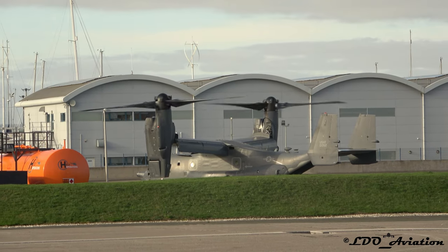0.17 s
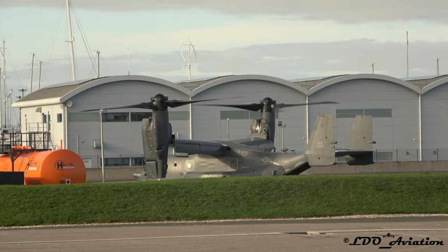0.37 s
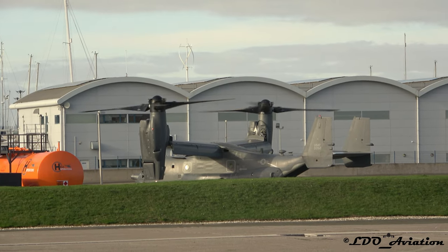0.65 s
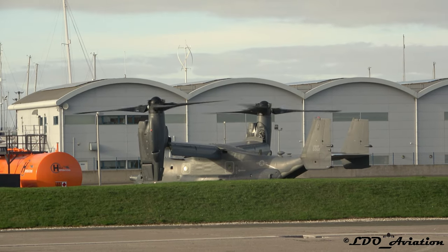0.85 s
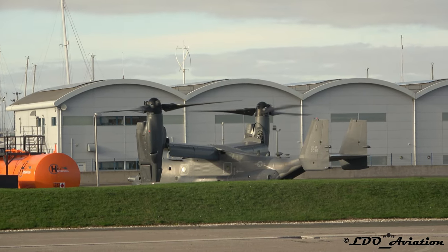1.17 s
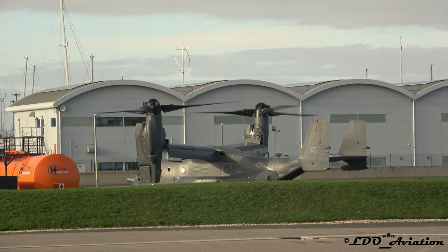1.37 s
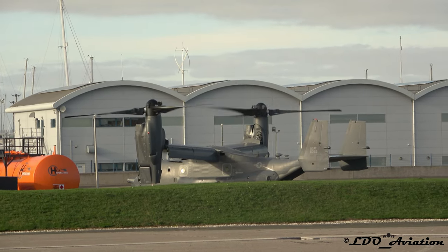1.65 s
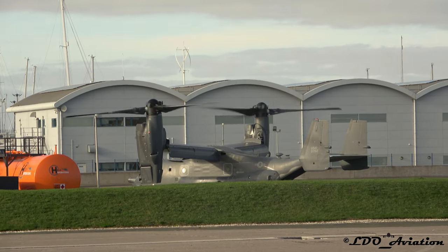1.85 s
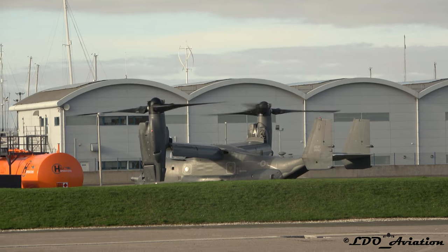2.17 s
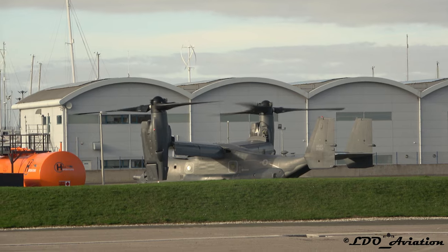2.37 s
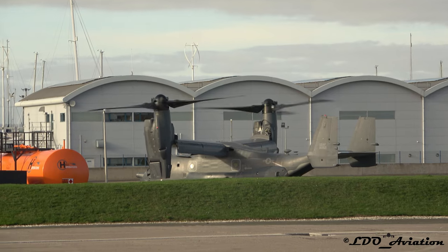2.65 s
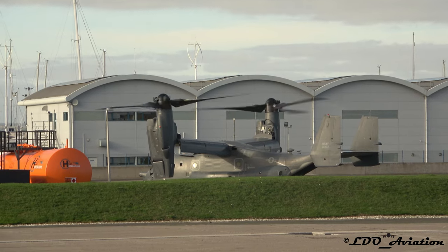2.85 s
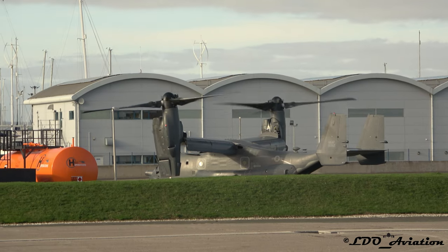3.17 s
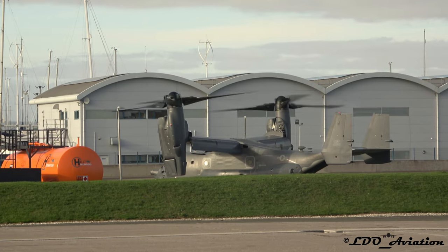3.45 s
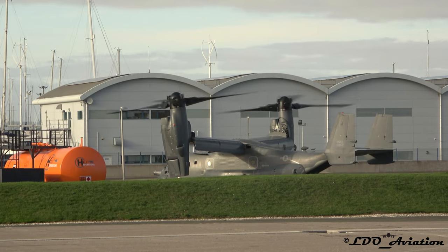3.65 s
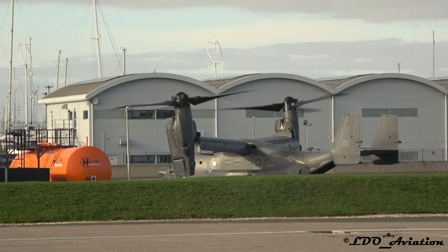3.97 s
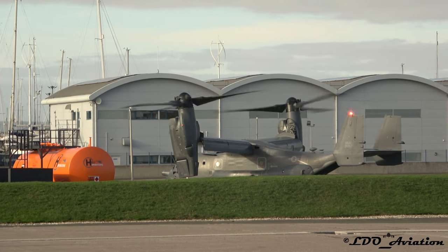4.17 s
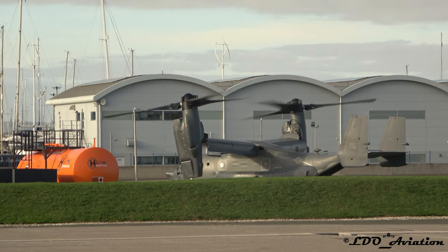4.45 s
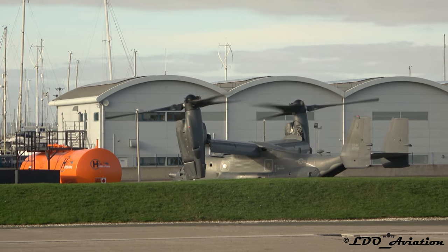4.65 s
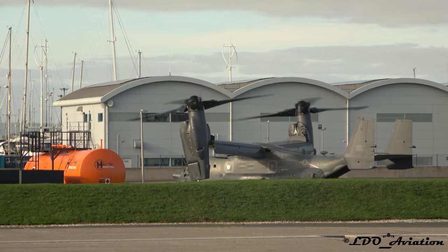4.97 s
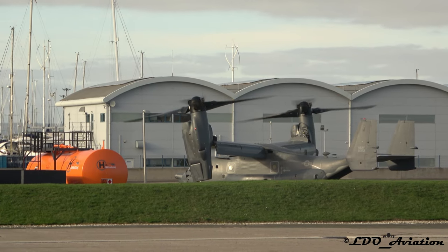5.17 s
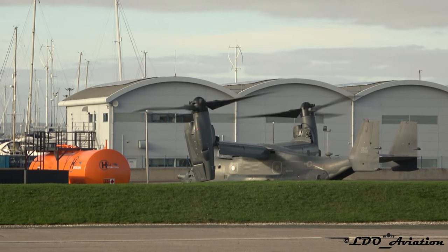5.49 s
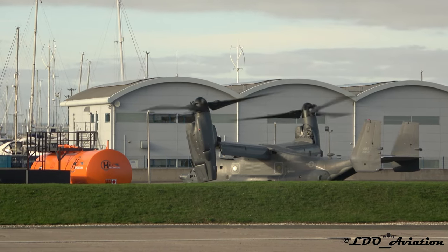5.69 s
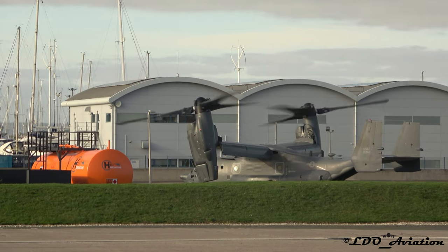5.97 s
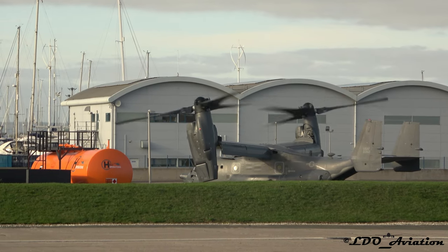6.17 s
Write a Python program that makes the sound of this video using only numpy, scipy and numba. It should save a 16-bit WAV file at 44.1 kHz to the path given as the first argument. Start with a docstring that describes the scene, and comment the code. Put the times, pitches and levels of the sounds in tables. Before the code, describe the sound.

Outdoors at an airfield, a tiltrotor stands with both rotors turning. Blades beat a steady, fast chop of low thumps and torn-air slaps, about twenty a second, some cracking harder than others. Behind them sit engine roar, airy hiss and a faint smeared turbine whine. Wind rumbles over the stereo microphones, harder on the left, strongest around the middle.

```python
"""Heavy, regular thumps and slaps of torn air come first: a tiltrotor aircraft idling on an apron some way off.
Its two rotors turn in step; each blade passage pulses filtered noise into slaps, swish and downwash.
Engine roar, hiss and a blurred compressor whine are noise bands chopped by the blades, over a low sine hum.
The aircraft arrives again by way of ground and hangar walls; gusts rumble on two microphones, the left harder."""
import sys
import numpy as np
from scipy import signal
from scipy.fft import rfft, irfft, next_fast_len
from scipy.io import wavfile
from scipy.ndimage import uniform_filter1d
from numba import njit

SR = 44100
rng = np.random.default_rng(int(sys.argv[2]) if len(sys.argv) > 2 else 0)


def store_wav(level_fs):
    """Save 16-bit WAV to argv[1]."""
    pcm = np.round(np.clip(np.atleast_2d(level_fs), -1, 1) * 32767)
    wavfile.write(sys.argv[1], SR, pcm.T.astype(np.int16))


N = 278712
T = np.arange(N) / SR  # time [s]
BLADE_HZ = 19.683  # blade passages per second, the same for both rotors


def undb(db):
    """Turn decibels into an amplitude factor."""
    return 10 ** (np.asarray(db) / 20)


def unit(x):
    """Scale to rms 1."""
    return x / np.sqrt(np.mean(x ** 2))


def curves(table):
    """Draw the columns of a table as automation curves, one value a sample."""
    s, *columns = np.transpose(table)
    return [np.interp(T, s, c) for c in columns]


def walk(rate):
    """Wander at random: levels held 1 / rate s and smoothed twice, rms 1."""
    hold = int(SR / rate)
    steps = np.repeat(rng.standard_normal(N // hold + 1), hold)
    smooth = uniform_filter1d(uniform_filter1d(steps, hold), hold)
    return unit(smooth[:N])


def shape(x, points, recur=0.):
    """Filter by (Hz, dB) points; a share may recur every blade passage, which draws lines in the spectrum."""
    hz, db = np.transpose(points)
    size = next_fast_len(N)
    f = np.maximum(np.fft.rfftfreq(size, 1 / SR), 1)
    gain = undb(np.interp(np.log(f), np.log(hz), db))
    gain = gain / (1 - min(recur, .9) * np.exp(-2j * np.pi * f / BLADE_HZ))
    return irfft(rfft(x, size) * gain, size)[..., :N]


def air(points, recur=0.):
    """Turbulence: noise of the given colour, rms 1."""
    return unit(shape(rng.standard_normal(N), points, recur))


@njit
def lowpass(x, hz, damp):
    """State-variable low-pass whose edge may move."""
    y, band, low = np.empty(len(x)), 0., 0.
    for i in range(len(x)):
        g = np.tan(np.pi * hz[i] / SR)
        v = (band + g * (x[i] - low)) / (1 + g * (g + damp))
        y[i] = low + g * v
        band, low = 2 * v - band, 2 * y[i] - low
    return y


def passage(delay_ms, width_ms, jitter_ms, scatter_db):
    """A bell-shaped bump once a blade passage, each a little early or late, bigger or smaller."""
    cycle = (T - delay_ms / 1000) * BLADE_HZ
    blade = np.round(cycle).astype(int)
    timing, size = rng.standard_normal((blade.max() + 2, 2))[blade + 1].T
    ms = (cycle - blade) * 1000 / BLADE_HZ - jitter_ms * timing
    bell = np.exp(-.5 * (ms / width_ms) ** 2)
    taper = np.cos(np.pi * (cycle - blade))  # silent halfway between blades
    return bell * taper * undb(scatter_db * size)


# pressure pulse of each rotor, before the high-pass: (delay [ms], width [ms], level [dB])
THUMP_PULSES = [(3.0, 2.27, -12), (15.5, 1.22, -12.5)]


def thumps():
    """The air each blade shoulders aside: a pressure pulse that repeats closely, hence a stack of low lines."""
    pulses = sum(undb(db) * passage(ms, width, 0.13, 0.71) for ms, width, db in THUMP_PULSES)
    return signal.sosfilt(signal.butter(1, 60, "high", fs=SR, output="sos"), pulses)


# the loud slap passes from one rotor to the other as the craft creeps round:
# (time [s], first rotor: slap level [dB], delay [ms], tip crack level [dB], second rotor: the same three)
ROTOR_SLAPS = [(0.0, -21.5, 7.8, -36, -21.5, 19.2, -28.5), (0.5, -23, 8.3, -32, -21, 18.1, -27.5),
               (0.85, -14, 5.6, -34, -22, 18, -36), (1.1, -18, 5.9, -33, -25, 19.6, -42),
               (1.5, -18, 4, -41, -28, 16.5, -46), (1.9, -17, 5.1, -38, -23, 16, -43),
               (2.3, -16.5, 3.5, -37, -24, 15.3, -40), (2.7, -24, 5.4, -30, -14, 14.7, -29),
               (3.1, -26, 4.7, -38, -19, 10.5, -43), (3.4, -20, 6, -43.5, -20.5, 13.7, -48),
               (3.9, -27.5, 6.1, -44, -18.5, 17.5, -40), (4.3, -28, 7, -42, -20.5, 16, -36),
               (4.6, -36, 6.7, -40, -19.5, 15, -32.5), (5.05, -36, 7.6, -50, -26.5, 15, -35.5),
               (5.45, -28, 7.3, -46, -19.5, 14.7, -26.5), (5.8, -36, 6.6, -44, -26.5, 13.7, -27),
               (5.95, -26, 4.6, -46, -25.5, 12.2, -38), (6.32, -25.5, 6.2, -46, -25.5, 13, -43)]
# colours of the torn air, lower and upper part, and of the tip crack: (frequency [Hz], relative level [dB])
SLAP_LOW_COLOUR = [(150, -23), (350, -0.5), (700, 0.5), (1000, 0.5), (1350, -4), (2000, -37), (4000, -72)]
SLAP_HIGH_COLOUR = [(500, -4.5), (1000, 0), (1500, 8.5), (2300, -2.5), (3500, -13.5), (6000, -24),
                    (9000, -35), (13000, -80)]
CRACK_COLOUR = [(900, -16), (2000, 12), (3000, 3), (5000, -0.5), (7500, -10.5), (10000, -35), (13000, -60)]
# per rotor: upper part of the slap against the lower [dB], lag of the lower part [ms]
HIGH_DB, LOW_LATE_MS = (-17, -3), (0.4, 1.2)
RAGGED_DB, RAGGED_PER_S = 1.4, 400  # rough edge on the slap level


def slaps(rotors):
    """Each blade cuts the wake of the one before: a few ms of torn air with a bright crack from the tip.
    Lower and upper parts vary on their own, so the slaps differ in colour."""
    out = 0
    for (db, ms, crack_db), high_db, late in zip(rotors, HIGH_DB, LOW_LATE_MS):
        low = passage(ms + late, 3.65, 1.2, 1.15) * air(SLAP_LOW_COLOUR, recur=0.38)
        high = passage(ms, 3.0, 1.5, 1.06) * air(SLAP_HIGH_COLOUR)
        level = undb(db + RAGGED_DB * walk(RAGGED_PER_S))
        crack = passage(ms + 0.65, 2.36, 1.5, 2.6) * air(CRACK_COLOUR)
        out = out + level * (low + undb(high_db) * high) + undb(crack_db) * crack
    return out


# slaps that stand out, before the trims below: (time [s], level [dB], tip crack against it [dB])
VORTEX_HITS = [(0.767, -8, -24), (0.868, -21, -19), (0.969, -10, -18), (1.07, -11.5, -13),
               (1.526, -23, -17), (1.577, -24, -15), (1.678, -13, -16), (1.83, -9, -15), (2.088, -9, -30),
               (2.188, -14.5, -24), (2.239, -16, -15), (2.288, -9, -20), (2.388, -9, -20),
               (2.435, -11, -23), (2.488, -9.5, -21), (2.704, -6, -22), (2.752, -8, -18),
               (2.906, -9.5, -29), (2.956, -6.5, -22), (3.007, -11.5, -11), (3.057, -5.5, -26),
               (3.409, -9, -25), (3.671, -9, -25), (3.723, -10, -30), (3.828, -15, -30),
               (4.383, -10.5, -25), (4.429, -19, -19), (5.245, -19, -19), (5.394, -17, -21),
               (5.449, -11.5, -18), (5.499, -11.5, -16), (5.549, -13.5, -16), (5.601, -20, -14),
               (5.65, -11, -14), (5.703, -14, -7), (5.751, -12, -12), (5.8, -16.5, -3), (5.855, -17, -13),
               (6.103, -21, -19)]
HARD_BODY_DB, HARD_TIP_DB, HARD_SHOCK_DB = -9, -5, -1  # trims of torn air, tip crack and shock
HARD_RISE_S, HARD_WIDTH_S = 0.001694, 0.0014  # table time to peak, width of the bell


def hard_slaps():
    """The blade passages that meet a vortex squarely: a small shock, torn air around it and a crack from the tip."""
    body, tip, shock = np.zeros((3, N))
    for s, db, tip_db in VORTEX_HITS:
        peak_s = s + HARD_RISE_S
        bump = np.exp(-.5 * ((T - s - HARD_RISE_S) / HARD_WIDTH_S) ** 2) * undb(db)
        body = body + bump
        tip = tip + bump * undb(tip_db)
        shock[int(peak_s * SR)] = undb(db)
    shock = shape(shock, SLAP_HIGH_COLOUR)
    shock = shock * body.max() / shock.max()
    torn = (air(SLAP_HIGH_COLOUR) + air(SLAP_LOW_COLOUR)) / np.sqrt(2)
    cracks = undb(HARD_TIP_DB) * tip * air(CRACK_COLOUR)
    return undb(HARD_BODY_DB) * body * torn + cracks + undb(HARD_SHOCK_DB) * shock


# hiss of the advancing blade: (time [s], level [dB])
SWISH_LEVEL = [(0, -30), (.5, -24.5), (.9, -23), (1.5, -30), (2.2, -22.5), (3.0, -26.5), (3.6, -47),
               (4.5, -32), (5.4, -41), (6.32, -29)]
# its colour: (frequency [Hz], relative level [dB per Hz])
SWISH_AIR = [(400, -22), (700, -7), (1100, 5.5), (1500, -5), (2500, -14.5), (5000, -17.5), (9000, -47)]


def swish():
    """The advancing blade hisses a little before the first rotor's next slap."""
    level_db, = curves(SWISH_LEVEL)
    return undb(level_db) * passage(45.5, 6, 4.0, 2.1) * air(SWISH_AIR)


# strength of the downwash: (time [s], level [dB])
DOWNWASH_LEVEL = [(0.0, -27.5), (0.35, -25.5), (0.65, -30.5), (1.3, -24.5), (1.65, -33.5), (2.2, -25.5),
                  (3.1, -27), (3.75, -35), (4.45, -26.5), (5.1, -26), (5.55, -30), (6.32, -26.5)]
# its colour: (frequency [Hz], relative level [dB per Hz])
DOWNWASH_COLOUR = [(60, -30), (130, -20), (210, 1.5), (300, 10), (400, 3.5), (520, 1.5), (800, -49),
                   (2000, -70)]
WASH_LATE_MS = (2.7, 2.6)  # swell after each rotor's slap


def wash(rotors):
    """Low churning downwash that swells behind each rotor's slap; the next blade meets much the same eddies."""
    level_db, = curves(DOWNWASH_LEVEL)
    louder_db = np.maximum(rotors[0][0], rotors[1][0])
    sweep = 0.35
    for (slap_db, ms, _), late in zip(rotors, WASH_LATE_MS):
        sweep = sweep + undb(0.22 * (slap_db - louder_db)) * passage(ms + late, 4.3, 2.8, 0.66)
    return undb(level_db) * unit(sweep * air(DOWNWASH_COLOUR, recur=0.69))


def drone():
    """A low hum on the fourth multiple of the blade rate, wavering in strength."""
    hum = np.sqrt(2) * np.sin(2 * np.pi * 4 * BLADE_HZ * T)
    return hum * undb(-34.5 + 2.0 * walk(2.97))


# turbine levels, the hiss before chopping: (time [s], hiss level [dB], whine level [dB])
TURBINE_LEVELS = [(0.0, -33, -48), (0.15, -35.5, -48), (0.45, -34, -50), (0.8, -34, -52), (1.1, -35, -44.5),
                  (1.5, -35, -48), (1.9, -35.5, -50), (2.25, -36.5, -50), (2.55, -33, -46), (2.8, -34, -45),
                  (3.1, -33.5, -49), (3.35, -33.5, -48), (3.65, -38, -52), (4.0, -34.5, -50),
                  (4.3, -36, -46.5), (4.65, -35.5, -46.5), (5.0, -36, -46), (5.4, -37.5, -46),
                  (5.75, -39.5, -49.5), (6.05, -40, -47), (6.32, -38.5, -50)]
# colours at the source: (frequency [Hz], relative level [dB per Hz])
ROAR_COLOUR = [(60, -14), (130, 4.5), (200, -4), (500, -4), (1000, -8), (1500, -11), (2200, -16.5),
               (3500, -36.5), (8000, -51), (12000, -93)]
HISS_COLOUR = [(1000, -1.5), (2000, 1), (3000, -0.5), (4700, -2), (5600, -6.5), (7000, -10), (8000, -14.5),
               (9000, -21.5), (10000, -28), (12000, -31), (14000, -40)]
WHINE_COLOUR = [(5300, -24), (5700, -8), (5880, 0), (6080, 0), (6300, -8), (6900, -26)]
ROAR_DB, ROAR_FADE_DB_PER_S, ROAR_SETTLES_S = -25, 0.73, 3.8  # start level before chopping, then a slow fade


def engines():
    """Roar, hiss and whine pass through the rotor discs, which chop them lightly."""
    hiss_db, whine_db = curves(TURBINE_LEVELS)
    roar_db = ROAR_DB - ROAR_FADE_DB_PER_S * np.minimum(T, ROAR_SETTLES_S)
    roar_chop = 1 + .5 * passage(7.5, 37.0, 3.8, 1.4)
    roar = roar_chop * air(ROAR_COLOUR, recur=0.33) * undb(roar_db + 0.23 * walk(3.8))
    hiss_chop = 1 + 0.4 * passage(1.8, 26.0, 22.0, 1.0)
    hiss = hiss_chop * air(HISS_COLOUR) * undb(hiss_db + .5 * walk(7.9))
    # turbulence on the way smears the compressor tone into a band
    whine_chop = 1.1 + passage(3.1, 6.8, 2.7, 1.5)
    whine = unit(whine_chop * air(WHINE_COLOUR)) * undb(whine_db + 1.1 * walk(14))
    return roar + hiss + whine


GROUND_SHARE, GROUND_HZ, BOUNCE_MS = 0.24, 2090, 2.882  # bounce amplitude, low-pass edge, mean lag


def ground(x):
    """The bounce off apron and grass, duller and a few ms late, combs the spectrum; moving air makes the lag waver."""
    lag = (BOUNCE_MS + 0.1 * walk(2.46)) * SR / 1000
    late = np.interp(np.arange(N) - lag, np.arange(N), x)
    late = signal.sosfilt(signal.butter(1, GROUND_HZ, fs=SR, output="sos"), late)
    return (x + GROUND_SHARE * late) / np.sqrt(1 + GROUND_SHARE ** 2)


# hangars, grass bank and camera body colour what arrives:
# (frequency [Hz], gain at first [dB], gain midway [dB], gain at last [dB])
PATH_COLOURS = [(120, 0, -2, -1.5), (180, -1, -2, 0.5), (241, -2, -1.5, 0), (307, 0.5, 0, -1.5),
                (408, -1.5, 0, -1), (463, -3.5, -2.5, -3.5), (526, -5, -8, -4), (683, -1, -1, -1.5),
                (754, -4.5, -3, -1.5), (815, -6.5, -8.5, -1.5), (898, 0.5, -2, -8), (1010, 1, 0, -2),
                (1104, -1.5, -2, 1.5), (1220, -.5, 2, -1.5), (1350, -4, -1, -4.5), (1573, -4.5, -5, -3.5),
                (1737, 0.5, 3, 1.5), (1980, -1.5, -3, -0.5), (2060, -2, -1, -1), (2330, 2, 2.5, 2.5),
                (2570, 0, 1, 0), (3150, 1.5, 1.5, 2)]
# crossfades from one colour to the next: (middle [s], length [s])
COLOUR_FADES = [(1.7, 0.91), (4.12, 0.94)]


def path(x):
    """Peaks and dips from nearby surfaces, shifting in two crossfades as the craft creeps round."""
    hz, *colours = np.transpose(PATH_COLOURS)
    once, twice = (np.clip((T - s) / length + .5, 0, 1) for s, length in COLOUR_FADES)
    shares = (1 - once, once - twice, twice)
    return sum(share * shape(x, np.c_[hz, db]) for share, db in zip(shares, colours))


# what the hangar walls return: (frequency [Hz], gain [dB])
WALL_COLOUR = [(300, -32), (480, -19.5), (800, -32.5), (1450, -24.5), (2000, -27), (3500, -17), (8000, -16),
               (12000, -29)]


def walls(craft):
    """Hangar walls scatter back a faint, decaying later copy that shimmers in the moving air."""
    lag_s = np.arange(SR // 10) / SR
    scatter = rng.standard_normal(len(lag_s)) * np.exp(-lag_s / 0.048) * (lag_s > .012)
    echo = signal.fftconvolve(craft, scatter / np.linalg.norm(scatter))[:N]
    return shape(echo * walk(140), WALL_COLOUR)


# colour of the large eddies, before the moving low-pass: (frequency [Hz], relative level [dB per Hz])
EDDY_COLOUR = [(2, -50), (8, -14), (16, -4), (26, 0), (40, -.5), (60, -3), (100, -4), (300, -9)]
# colour of the small eddies, brought out by strong gusts: (frequency [Hz], relative level [dB per Hz])
SMALL_EDDY_COLOUR = [(50, -15), (100, 2.5), (160, -2.5), (250, -17.5), (400, -31), (700, -60)]
SMALL_DB, SMALL_GROWTH = -37, 1.33  # level in a gust of -19 dB, dB gained per dB of gust


def buffet(db):
    """Eddies on one microphone: a deep rumble that reaches higher as the gust grows."""
    edge_hz = np.clip(74.5 + 0.98 * (db + 27.5), 30, 105)
    rumble = air(EDDY_COLOUR)
    for damp in (1.5, 1.2):
        rumble = lowpass(rumble, edge_hz, damp)
    small = air(SMALL_EDDY_COLOUR) * undb(SMALL_DB + SMALL_GROWTH * (db + 19))
    return unit(rumble) * undb(db) + small


# gusts before the microphone offsets: (time [s], strength [dB], lean to the left microphone [dB])
GUST_LEVELS = [(0.0, -26.5, 7), (0.25, -24, 0), (0.45, -31, 0), (0.62, -22.5, 6), (1.15, -23, 7),
               (1.35, -17, 3), (1.7, -19.5, 5), (2.0, -16.5, 3), (2.08, -22, 1), (2.17, -24, -2),
               (2.22, -30, 7), (2.45, -28, 7), (2.58, -16.5, 3), (2.72, -24, 5), (2.92, -16.5, 9.5),
               (2.99, -21.5, 1), (3.08, -11, 4), (3.22, -12, 5), (3.36, -14.5, 1), (3.44, -13, 2),
               (3.56, -12.5, 6), (3.63, -27, 10), (3.75, -31, 5), (3.93, -17, 11), (4.0, -21.5, 3),
               (4.07, -15.5, 4), (4.2, -25, 1), (4.37, -18.5, 3.5), (4.65, -27.5, 5), (4.95, -23.5, 4),
               (5.11, -17.5, 1), (5.25, -24.5, 11.5), (5.4, -12.5, 7.5), (5.55, -15, 7.5), (5.68, -19, 3),
               (5.86, -31, 6), (6.04, -19, 2), (6.32, -25, 6)]
LEFT_DB, RIGHT_DB = 3, -2.5  # how hard a gust bears on each microphone
LEFT_FLUTTER_DB, RIGHT_FLUTTER_DB = 0.94, 2.5
# drift of an eddy from left to right: lag, amplitude share, edge below which it holds together
EDDY_LAG_MS, EDDY_SHARE, EDDY_HOLDS_HZ = 4.2, 0.9, 126


def wind():
    """Large eddies drift across the camera, reaching the right microphone a few ms late; small ones break up."""
    gust_db, lean_db = curves(GUST_LEVELS)
    left = buffet(gust_db + lean_db / 2 + LEFT_DB + LEFT_FLUTTER_DB * walk(11))
    right = buffet(gust_db - lean_db / 2 + RIGHT_DB + RIGHT_FLUTTER_DB * walk(11))
    large = signal.sosfiltfilt(signal.butter(1, EDDY_HOLDS_HZ, fs=SR, output="sos"), left)
    drifted = np.interp(T - EDDY_LAG_MS / 1000, T, large) * undb(-lean_db)
    return np.array([left, right + EDDY_SHARE * drifted])


# right microphone against the left, for the aircraft: (frequency [Hz], gain [dB])
RIGHT_COLOUR = [(250, -0.38), (1000, 0.22), (8000, 1.3)]


def scene():
    """Layer the aircraft, send it by ground, path and walls to both microphones, and add the wind."""
    rotors = np.reshape(curves(ROTOR_SLAPS), (2, 3, N))
    craft = thumps() + slaps(rotors) + hard_slaps() + swish() + wash(rotors) + drone() + engines()
    centre = path(ground(craft))
    echo = walls(craft)  # opposite polarity left and right, so it sounds wide
    return np.array([centre + echo, shape(centre, RIGHT_COLOUR) - echo]) + wind()


# treble response of the microphones: (frequency [Hz], gain [dB])
MIC_RESPONSE = [(8000, -1.5), (10000, -2.5), (11500, -9), (12500, -17), (13300, -24), (15000, -30)]
TOP_HZ = 15600


def record(dry):
    """The microphones fade in the treble, peaks beyond full scale clip, then the top is cut steeply."""
    clipped = np.clip(shape(dry, MIC_RESPONSE), -1, 1)
    return signal.sosfilt(signal.ellip(8, .2, 70, TOP_HZ, fs=SR, output="sos"), clipped)


dry = scene()
out = record(dry)
store_wav(out)
```